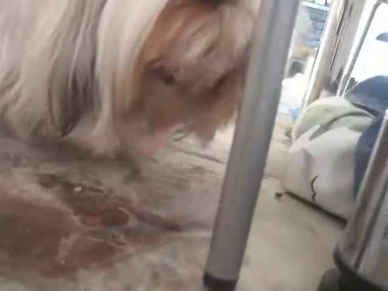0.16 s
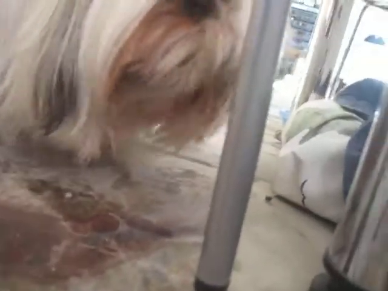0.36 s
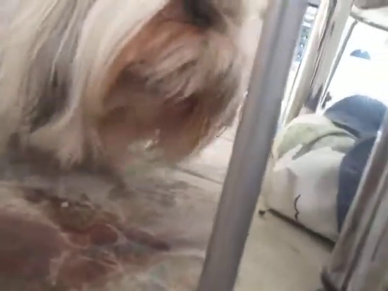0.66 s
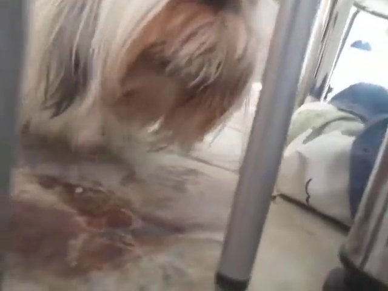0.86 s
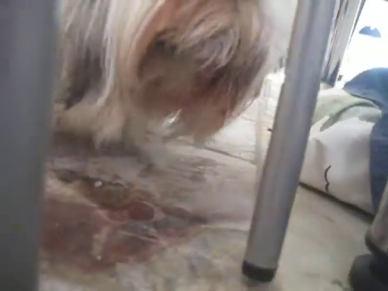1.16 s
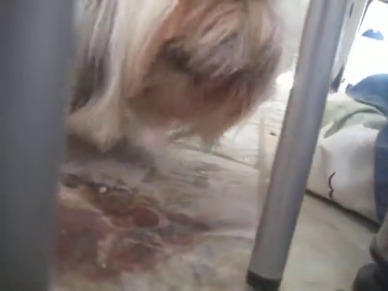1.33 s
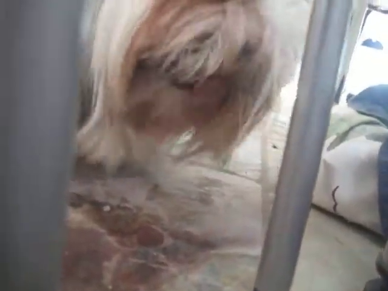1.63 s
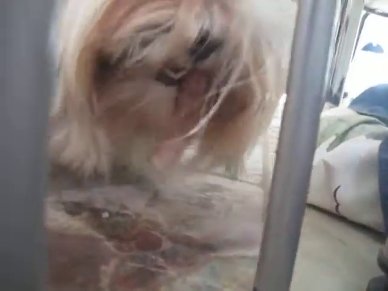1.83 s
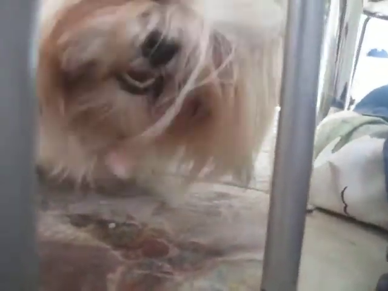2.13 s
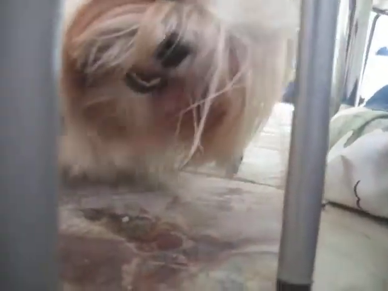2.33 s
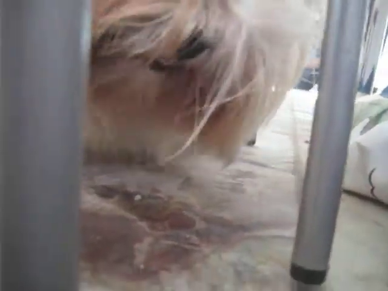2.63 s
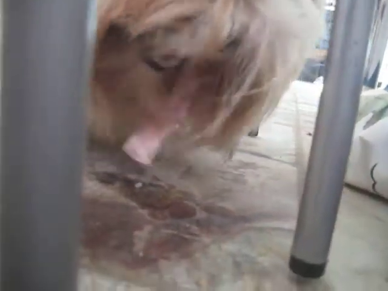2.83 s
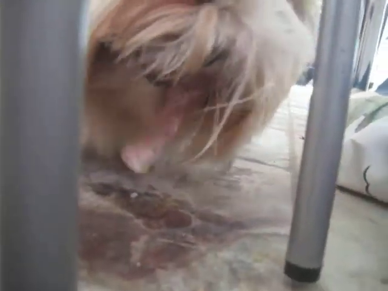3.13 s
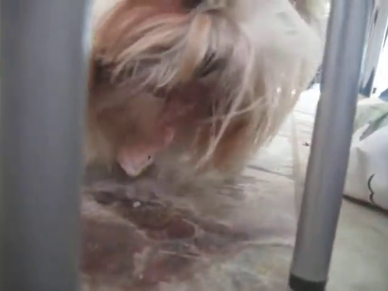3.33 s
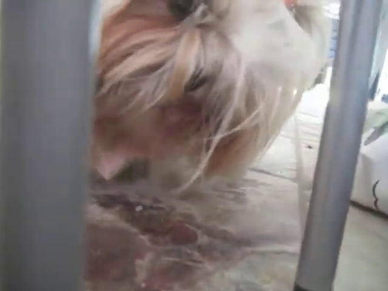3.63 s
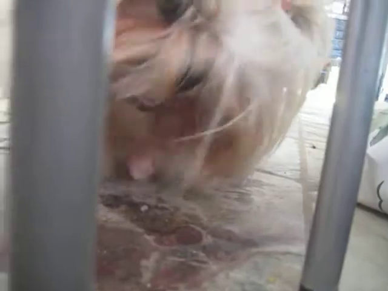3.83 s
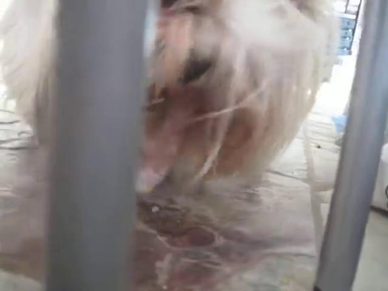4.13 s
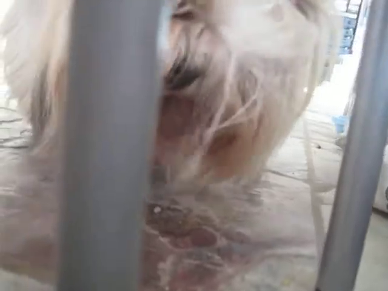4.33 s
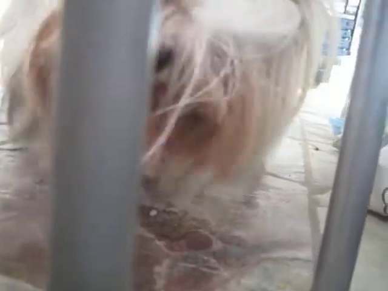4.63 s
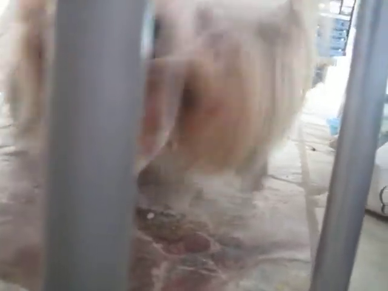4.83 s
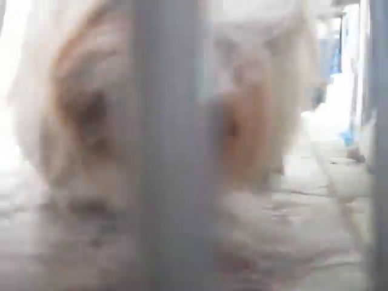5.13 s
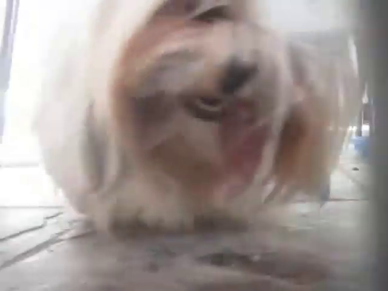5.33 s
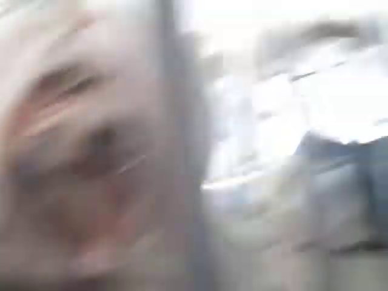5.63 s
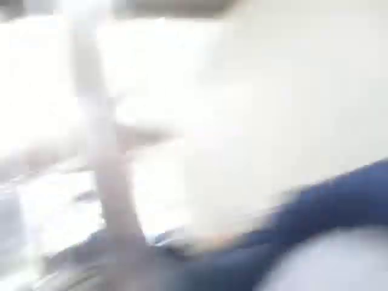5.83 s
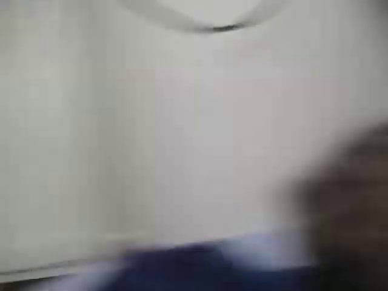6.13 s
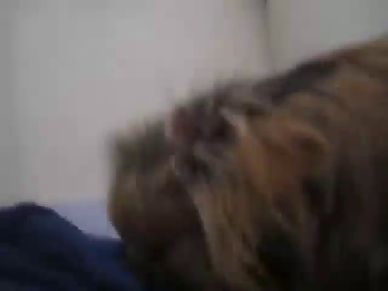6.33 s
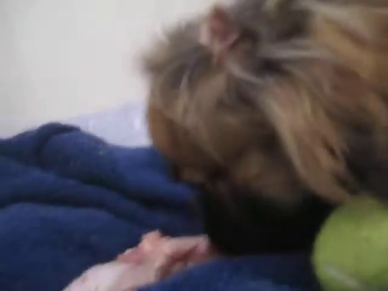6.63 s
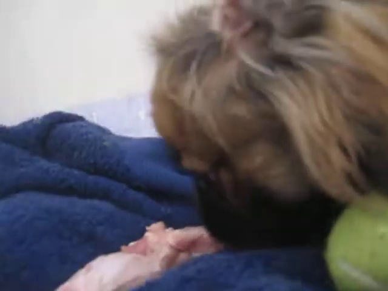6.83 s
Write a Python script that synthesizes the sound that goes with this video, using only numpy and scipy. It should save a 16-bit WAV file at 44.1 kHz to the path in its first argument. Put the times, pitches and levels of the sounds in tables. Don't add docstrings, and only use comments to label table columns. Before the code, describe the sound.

Bone crunches continuously in a small dog's mouth, several uneven bites a second. Sharp shards snap, bright splinters tick, gristle crackles, and wet lips click and smack. Chewing eases a little around three seconds, becomes dense after four, and peaks with a hard crack just past six amid rubbing rustle as the camera moves. The microphone is near and dry, in a small hard room, with steady faint electronic hum and hiss.

```python
import sys
import numpy as np
from scipy import signal
from scipy.fft import rfft, irfft, next_fast_len
from scipy.io import wavfile
from scipy.ndimage import uniform_filter1d, map_coordinates

SR = 44100
rng = np.random.default_rng(int(sys.argv[2]) if len(sys.argv) > 2 else 0)


def linear_from_db(decibels):
    return 10 ** (np.asarray(decibels, float) / 20)


def unload_wav(signal):
    wavfile.write(
        sys.argv[1],
        SR,
        np.round(np.clip(np.atleast_2d(signal).T, -1, 1) * 32767).astype(np.int16),
    )


N = 306936


def unit(x):
    return x / np.sqrt(np.mean(x ** 2) + 1e-20)


def wobble(rate):
    knots = rng.standard_normal(int(N * rate / SR) + 4)
    return map_coordinates(knots, [np.arange(N) * rate / SR])


def coloured(x, points):
    m = next_fast_len(N + 8192)
    hz, db = np.transpose(points)
    gain = linear_from_db(np.interp(np.log(np.fft.rfftfreq(m, 1 / SR) + 1), np.log(hz), db, -120, -120))
    return unit(irfft(rfft(x, m) * gain, m)[:N])


def add(track, s, sound):
    track[round(s * SR):][:len(sound)] += sound


def chance(hz, octaves):
    return hz * 2 ** (octaves * np.clip(rng.standard_normal(), -2, 2))


def fracture(hz, octaves, t60, t):
    fading = linear_from_db(-60 * t / t60) + linear_from_db(-10 - 60 * t / (4 * t60))
    force = fading * rng.standard_normal(len(t))
    force[0] = 11.1 * np.sign(force[0])
    edges = np.clip(hz * 2 ** (octaves * np.array([-.5, .5])), 100, .45 * SR)
    burst = signal.sosfilt(signal.butter(3, edges, "bandpass", fs=SR, output="sos"), force)
    return burst / np.abs(burst).max()


# (multiple of the hum pitch, level [dB rms])
HUM_OVERTONES = [(1, -59), (2, -68), (3, -85), (4, -73.5), (5, -71), (6, -70), (7, -69), (9, -77),
                 (30, -70)]
# (pitch [Hz], level [dB rms])
WHINE_TONE = (5879.6, -65.5)
# (pitch [Hz], level [dB per Hz])
HISS_COLOUR = [(20, -1.5), (350, 3), (1000, -1), (2500, -8), (4200, -9.5), (8500, -17.5), (12000, -17.5),
               (16000, -34)]


def camera():
    hum_hz = 49.17
    turn = 2 * np.pi * np.cumsum(hum_hz * (1 + 0.00173 * wobble(2.55))) / SR
    hum = np.zeros(N)
    for multiple, db in HUM_OVERTONES:
        level = linear_from_db(db + 0.63 * wobble(5.8))
        hum += level * np.sin(multiple * turn + rng.uniform(0, 2 * np.pi))
    whine_hz, whine_db = WHINE_TONE
    whine = linear_from_db(whine_db + wobble(6.7)) * np.sin(2 * np.pi * whine_hz * np.arange(N) / SR)
    hiss = linear_from_db(-57.0) * coloured(rng.standard_normal(N), HISS_COLOUR)
    return np.sqrt(2) * (hum + whine) + hiss


def kitchen(x):
    t = np.arange(SR // 3) / SR
    tail = rng.standard_normal(len(t)) * linear_from_db(-60 * t / 0.27) * (1 - np.exp(-t / 0.002))
    tail = signal.lfilter([1], [1, -.82], tail)
    return signal.fftconvolve(x, tail / np.linalg.norm(tail))[:N]


def patchy(x, depth_db):
    z = signal.stft(x, nperseg=128)[2]
    field = uniform_filter1d(rng.standard_normal(z.shape), size=6, axis=0)
    field = uniform_filter1d(field, size=14, axis=1)
    return signal.istft(z * linear_from_db(depth_db * unit(field)), nperseg=128)[1][:N]


# (start [s], end [s])
RUSTLE_SPAN = (5.67, 6.97)


def crackle(per_s, spread_db, noise_share, patch_db=3.5):
    fires = rng.random(N) < per_s / SR * linear_from_db(6 * wobble(30))
    sizes = linear_from_db(spread_db * np.clip(rng.exponential(size=N), 0, 2))
    grains = np.convolve(fires * sizes, np.exp(-np.arange(40) / 12))[:N] * rng.standard_normal(N)
    swinging = np.abs(np.arange(N) / SR - np.mean(RUSTLE_SPAN)) < np.ptp(RUSTLE_SPAN) / 2
    share = np.where(swinging, .75, np.clip(noise_share, 0, 1))
    rubbing = unit(linear_from_db(2.2 * wobble(60)) * rng.standard_normal(N))
    return patchy(np.sqrt(1 - share) * unit(grains) + np.sqrt(share) * rubbing, depth_db=patch_db)


# (time of full pressure [s], held [s],
# gristle level [dB], extra brittleness [dB])
JAW_STROKES = [(.012, 0.01, -51, -12), (.17, 0.012, -44.5, -5), (.344, 0.045, -48, -12),
               (.569, 0.01, -43.5, -12), (.708, 0.035, -47, -17), (.938, 0.0061, -43, -5.5),
               (1.1, 0.035, -50, -10.5), (1.337, 0.05, -49.5, -2), (1.65, 0.15, -51.5, -5),
               (1.955, 0.03, -50, -1), (2.399, 0.11, -47, -5.5), (2.679, .01, -59, -12),
               (2.804, 0.022, -50, -4), (2.978, 0.0042, -72, -3), (3.148, 0.0065, -55.5, -2),
               (3.41, 0.091, -68.5, 13), (3.635, 0.047, -49.5, -22), (3.74, 0.1, -50.5, -3),
               (4.096, 0.14, -50.5, -5), (4.415, 0.19, -50, -11), (4.759, 0.12, -47, -10.5),
               (5.07, 0.2, -49, -9.5), (5.46, 0.18, -57, 1), (5.721, 0.028, -38, -10.5),
               (5.971, 0.089, -48, 0), (6.162, 0.016, -43, -9), (6.24, 0.18, -43.5, -2.5),
               (6.58, 0.011, -49, -3), (6.767, 0.0048, -44.5, -6.5), (6.95, .02, -47.5, -8)]


def pressure():
    bite_db_per_s, ease_db_per_s = 183, 153
    rest_mouth_db, rest_gristle_db, rest_fizz_db = -60.5, -58, -63
    s, held, db, brittle_db = np.transpose(JAW_STROKES)[..., None]
    t = np.arange(0, N, 64) / SR
    building_db = bite_db_per_s * np.clip(s - t, 0, None)
    easing_db = ease_db_per_s * np.clip(t - s - held, 0, None)
    stroke = linear_from_db(db - building_db - easing_db)
    gristle = np.sqrt(linear_from_db(2 * rest_gristle_db) + np.sum(stroke ** 2, axis=0))
    fizz = np.sqrt(linear_from_db(2 * rest_fizz_db) + np.sum((stroke * linear_from_db(brittle_db)) ** 2, axis=0))
    mouth = linear_from_db(rest_mouth_db) * (gristle / linear_from_db(rest_gristle_db)) ** 0.38
    return [np.interp(np.arange(N) / SR, t, gain) for gain in (mouth, gristle, fizz)]


# (pitch [Hz], level [dB per Hz])
MOUTH_COLOUR = [(120, -10), (350, -1.5), (1200, 1), (2200, -12.5), (3500, -15)]
GRISTLE_COLOUR = [(1500, -4.5), (2600, -2), (3300, 2.5), (4250, 4.5), (5500, -1.5), (6600, -1.5),
                  (8500, -24)]
FIZZ_COLOUR = [(5000, -58), (7200, -6.5), (8500, -2), (11000, -8), (13000, -11.5), (15500, -15),
               (17000, -76)]


def grinding():
    common = crackle(per_s=180, spread_db=1.0, noise_share=0.26)
    mouth = 0.25 * common + crackle(per_s=60, spread_db=2.0, noise_share=0.85, patch_db=2.5)
    gristle = 1.11 * common + crackle(per_s=500, spread_db=4, noise_share=0.22)
    fizz = 1.3 * common + crackle(per_s=500, spread_db=11.0, noise_share=0.18)
    mouth = coloured(mouth, MOUTH_COLOUR)
    gristle = coloured(gristle, GRISTLE_COLOUR)
    fizz = coloured(fizz, FIZZ_COLOUR)
    t = np.arange(N) / SR
    dulled = signal.lfilter(*signal.butter(1, 7000, fs=SR), fizz)
    fizz = np.where(t < RUSTLE_SPAN[0], fizz, dulled)
    mouth = mouth * linear_from_db(6.5 * (t > 6.15) * (t < 6.6))
    mouth_gain, gristle_gain, fizz_gain = pressure()
    return mouth_gain * mouth + gristle_gain * gristle + fizz_gain * fizz


def small_clicks(events, octaves, t60):
    out, t = np.zeros(N + SR), np.arange(SR // 40) / SR
    for s, db, hz in events:
        add(out, s, linear_from_db(db - 1.5) * fracture(hz, octaves, t60, t))
    return out[:N]


# (time [s], peak level [dB], pitch [Hz])
MOUTH_CLICKS = [(0.2305, -37.7, 1410), (0.2369, -38.0, 1290), (0.4264, -41.5, 870), (0.5404, -39, 890),
                (1.387, -38, 1610), (1.5432, -41.6, 880), (1.5514, -41, 1260), (1.7717, -37.7, 1160),
                (2.1503, -36, 1200), (2.5102, -33, 1270), (2.8202, -41.5, 1230), (2.8594, -40, 1320),
                (2.8903, -34.5, 1280), (3.0721, -45, 523), (3.2854, -40, 1190), (3.8229, -36, 1800),
                (3.95, -39.5, 1020), (4.0604, -36.5, 1560), (4.3129, -32.5, 1130), (4.4625, -34, 1930),
                (4.4801, -38, 1680), (5.0988, -37, 1020), (5.8783, -39.1, 610), (5.9735, -31.7, 1320),
                (6.0328, -39, 1460), (6.6815, -40, 1310), (6.7682, -35.5, 1100), (6.8354, -37, 2000),
                (6.8944, -39, 1480)]


def clucks():
    return small_clicks(MOUTH_CLICKS, octaves=0.59, t60=0.0085)


# (time [s], peak level [dB], pitch [Hz])
TOOTH_NICKS = [(0.1243, -27, 3120), (0.1372, -29, 4010), (0.2306, -32, 3230), (0.7309, -30, 4150),
               (0.4364, -35, 4220), (0.6822, -37, 4180), (0.914, -29.8, 4010), (1.0637, -32, 4110),
               (1.0903, -29.0, 4170), (1.128, -25, 3770), (1.3423, -31.9, 3720), (1.4194, -28, 3510),
               (1.706, -28, 3660), (1.9874, -30.8, 3420), (2.0612, -34.5, 3300), (2.3973, -26, 4330),
               (2.4235, -28, 3710), (1.1404, -31, 4050), (2.7029, -32, 4080), (2.7956, -35, 2500),
               (2.8224, -29.3, 4790), (2.8151, -31, 5190), (3.1704, -34, 3850), (3.563, -33.4, 4010),
               (5.813, -33, 2600), (5.7845, -27, 5000), (3.9711, -27, 5300), (4.0115, -34, 4100),
               (4.0686, -32, 3210), (4.0938, -30, 4450), (4.111, -26, 3820), (4.4983, -31.9, 3510),
               (4.8816, -29.5, 3190), (4.6254, -36, 4320), (4.7416, -30, 3460), (4.7459, -32.5, 5150),
               (4.8253, -28, 3230), (4.9856, -33, 3560), (5.2435, -31, 4130), (5.2225, -31, 3210),
               (5.326, -38, 4770), (5.401, -28.7, 4800), (5.4063, -33, 4450), (5.4611, -33, 5030),
               (5.4889, -29, 4640), (5.5011, -31.6, 3930), (5.5323, -29.5, 5120), (5.5468, -26.5, 5180),
               (5.6416, -31.9, 5010), (5.9985, -32, 4170), (6.0332, -32, 3760), (6.0603, -32.4, 4000),
               (6.4132, -31, 4290), (6.7765, -29, 4300), (6.5709, -27, 4200)]


def nicks():
    return small_clicks(TOOTH_NICKS, octaves=0.45, t60=0.0046)


# (time [s], peak level [dB], pitch [Hz])
BONE_FLECKS = [(0.0115, -34, 7670), (0.0173, -23.5, 10060), (0.1826, -26, 10300), (0.7495, -34, 11200),
               (0.523, -29, 9810), (0.5628, -30, 9010), (0.7445, -29, 8700), (0.789, -32, 10550),
               (1.1404, -35, 9170), (1.0537, -34, 8110), (1.064, -32, 8510), (1.874, -36, 11300),
               (1.3352, -20, 11500), (1.3748, -33, 13400), (1.4237, -26, 8490), (1.4654, -32, 10390),
               (1.7012, -30, 12500), (1.6946, -33.3, 8310), (1.7059, -31, 7460), (1.7765, -37, 11500),
               (1.896, -33, 7610), (2.3883, -30, 11200), (2.0237, -20, 10500), (2.4328, -26, 8160),
               (4.4206, -26, 11000), (2.6288, -35.4, 9180), (0.1364, -31, 11300), (3.0925, -33, 8120),
               (3.3819, -36, 12500), (3.4291, -33, 7500), (3.7244, -29, 13500), (4.0114, -36, 9370),
               (4.1221, -27, 8590), (4.4703, -22.5, 7000), (4.4992, -33, 8900), (4.5029, -22, 7440),
               (4.5094, -28, 7430), (4.7339, -25, 6900), (4.7447, -29, 7010), (4.761, -32.4, 7520),
               (4.2306, -35, 12400), (4.9562, -35, 7880), (4.9696, -35, 7840), (5.0197, -34, 8080),
               (5.2436, -27, 8500), (5.2642, -29.8, 8840), (5.9573, -35, 9260), (5.3259, -36, 9370),
               (5.3901, -34, 11200), (5.4062, -33, 9290), (5.805, -32, 8500), (5.5066, -24.5, 8970),
               (5.5324, -34.7, 9490), (5.7306, -23, 9150), (5.7632, -29, 8650)]


def flecks():
    return small_clicks(BONE_FLECKS, octaves=0.42, t60=0.0044)


# (time [s], peak level [dB], pitch [Hz])
LIP_SMACKS = [(0.179, -27.5, 1580), (0.262, -30, 1010), (0.482, -34.5, 1570), (1.304, -39, 1630),
              (1.909, -33.5, 1160), (2.173, -31, 1050), (2.208, -30.5, 1210), (2.718, -40, 1210),
              (2.795, -34, 2090), (2.904, -35.5, 720), (3.436, -35, 1140), (3.969, -32, 900),
              (4.742, -32, 1860), (6.621, -32.5, 1630)]


def smacks():
    out, t = np.zeros(N + SR), np.arange(SR // 20) / SR
    for s, db, hz in LIP_SMACKS:
        swell = linear_from_db(db - 3.0 - 60 * t / 0.02) * (1 - np.exp(-t / 0.000083))
        add(out, s, swell * np.sin(2 * np.pi * hz * t * (1 + 6 * t)))
    return out[:N]


# (time [s], level [dB], pitch [Hz], width [Hz], time to
# fade 60 dB [s])
CRUSHES_AND_POPS = [(.322, -22.5, 920, 503, 0.0097), (0.688, -19.5, 1040, 350, 0.027),
                    (1.944, -32, 1340, 220, 0.096), (1.06, -47, 4120, 1500, 0.44),
                    (1.815, -39, 1700, 400, 0.1), (6.33, -50, 1000, 1200, 0.52),
                    (2.11, -26, 597, 800, 0.018), (2.344, -20, 1160, 500, 0.0096),
                    (2.538, -37.5, 1340, 200, 0.061), (3.228, -49, 1580, 248, 0.15),
                    (3.474, -39.5, 334, 800, 0.15), (3.623, -31.5, 1320, 1190, 0.19),
                    (3.753, -43, 260, 300, 0.07), (6.556, -36.5, 6330, 1300, 0.08),
                    (3.625, -39.5, 9200, 3000, 0.2), (4.398, -28.5, 9400, 1500, 0.034),
                    (4.771, -46, 2490, 1290, 0.62), (5.686, -43.5, 890, 1500, 0.35),
                    (5.931, -44.5, 1550, 500, 0.34), (6.063, -28, 850, 1000, 0.033),
                    (6.135, -34, 590, 800, 0.021), (6.15, -23, 3330, 1400, 0.12),
                    (6.155, -34, 6000, 1800, 0.3), (3.625, -39.5, 4340, 4000, 0.18),
                    (6.247, -39, 5400, 2500, 0.38), (6.556, -34, 4370, 900, 0.15),
                    (6.696, -39, 2490, 1520, 0.095), ]


def crushes():
    out, t = np.zeros(N + SR), np.arange(SR // 4) / SR
    for s, db, hz, width_hz, t60 in CRUSHES_AND_POPS:
        b, a = signal.iirpeak(hz, hz / width_hz, SR)
        lumps = linear_from_db(4.4 * unit(uniform_filter1d(rng.standard_normal(len(t)), size=60)))
        tail = signal.lfilter(b, a, lumps * rng.standard_normal(len(t)))
        tail = signal.lfilter(b, a, tail)
        add(out, s, linear_from_db(db - 60 * t / t60) * (1 - np.exp(-t / 0.00093)) * unit(tail))
    return out[:N]


# (time [s], peak level [dB], pitch [Hz], time to fade 60 dB [s])
BREAK_RINGS = [(0.3219, -17.5, 2310, 0.011), (0.3207, -38, 540, 0.023), (.6888, -12.5, 4250, 0.022),
               (.6895, -24.5, 2160, 0.017), (2.1101, -30.5, 395, 0.0089), (4.3723, -28, 1950, 0.045),
               (4.3728, -38, 423, .02), (4.7702, -26, 1970, 0.025), (4.7698, -36, 2600, 0.016),
               (6.0645, -38, 326, 0.085), (6.0645, -24.5, 757, 0.032), (6.0635, -22, 1120, 0.021),
               (6.0633, -33, 1450, 0.026), (6.1382, -5, 6000, 0.007), (6.1376, -24, 14600, 0.0016),
               (3.6237, -19, 1750, 0.013)]


def rings():
    out, t = np.zeros(N + SR), np.arange(SR // 10) / SR
    for s, db, hz, t60 in BREAK_RINGS:
        swell = linear_from_db(db - 60 * t / t60) * (1 - np.exp(-3 * hz * t))
        add(out, s, swell * np.sin(2 * np.pi * hz * t))
    return out[:N]


JAW_DB = -18.5


def small_break(s, shard_db, splinter_db, shard_hz):
    splinter_hz = chance(8580 if s < RUSTLE_SPAN[0] else 7170, 0.18)
    return s, shard_db + JAW_DB, shard_db, splinter_db, shard_hz, splinter_hz


# (time [s], peak level [dB])
FAINT_TICKS = [(0.0907, -24), (0.5975, -25), (0.863, -25), (1.127, -29), (1.643, -24.5), (1.6818, -27),
               (2.774, -25), (2.8225, -36), (2.8603, -26), (2.9864, -30.5), (3.342, -25.5), (3.419, -30),
               (3.553, -24.5), (3.9645, -28), (4.0226, -31), (4.4204, -27), (4.442, -21), (4.503, -26),
               (4.5143, -30), (4.7572, -24), (4.711, -33), (5.1257, -21.5), (5.391, -28), (6.032, -29),
               (6.4815, -26)]


def faint_ticks():
    return [small_break(s, db - 3.0, db - .8, chance(4040, 0.19)) for s, db in FAINT_TICKS]


# (time [s], peak level [dB], pitch [Hz])
DULL_TICKS = [(0.175, -25, 3150), (0.262, -23, 4450), (0.352, -25, 3600), (0.4259, -23, 3300),
              (0.828, -23.5, 3600), (1.035, -20, 3770), (1.1642, -25.5, 3800), (1.2316, -24, 3750),
              (1.3737, -25.5, 3580), (1.3992, -22.5, 3800), (1.5632, -27, 3280), (2.2956, -24, 3750),
              (2.6785, -24, 3940), (3.1153, -28, 4600), (3.6887, -23, 3450), (3.723, -25, 3690),
              (3.7628, -25, 3900), (3.8564, -22, 4500), (4.0757, -21, 3930), (4.4268, -20, 4330),
              (4.4805, -18, 4300), (5.025, -23.5, 3760), (5.1669, -24.5, 4220), (5.236, -20.5, 4340),
              (5.4103, -21, 4580), (6.1415, -8, 3400), (6.558, -27, 4200), (6.8947, -23, 3550)]
CHIPPING_TICKS = [(0.017, -28.5, 3500), (0.1804, -21, 3080), (0.237, -23, 3100), (0.2704, -26, 3150),
                  (0.7492, -28, 3900), (0.8322, -26.5, 5000), (0.922, -20.5, 3900), (1.028, -24.5, 3880),
                  (1.4468, -19, 3200), (1.6472, -27, 3400), (1.7722, -26.5, 3070), (1.791, -24, 3870),
                  (2.096, -24, 3960), (2.2146, -26, 3900), (2.3562, -21, 4070), (2.3959, -29, 4630),
                  (2.8448, -24.5, 4180), (3.286, -26, 3830), (3.4353, -19, 4140), (4.0799, -24, 3800),
                  (4.118, -22, 4150), (4.2307, -25, 4740), (4.4556, -24, 4230), (4.4699, -30, 3890),
                  (4.5247, -20.5, 3300), (4.8291, -21, 3260), (5.367, -21, 4070), (5.4816, -29, 4420),
                  (5.731, -29, 4100)]


def ticks():
    rows = []
    for events, fizz_db in [(DULL_TICKS, -17), (CHIPPING_TICKS, -4)]:
        for s, db, hz in events:
            rows.append(small_break(s, db, db + 4.5 + fizz_db, hz))
    return rows


# (time [s], peak level [dB], pitch [Hz])
THIN_SPLINTERS = [(0.14, -23, 8100), (0.1948, -18, 8900), (0.517, -16, 10100), (0.8, -9, 11100),
                  (0.9365, -17, 10000), (1.183, -21.5, 8040), (1.321, -12, 12000), (1.4186, -11.5, 8400),
                  (1.612, -21, 6530), (1.6524, -28, 7700), (1.728, -21, 9400), (1.805, -15.5, 11300),
                  (2.0238, -14, 6600), (2.2093, -20.5, 9000), (2.054, -29, 10500), (2.3818, -24, 7400),
                  (2.508, -21.5, 8200), (2.7614, -16, 9200), (3.0687, -21, 8760), (3.3929, -12.5, 9000),
                  (3.717, -19.5, 9840), (3.7835, -21.5, 8600), (4.0933, -20, 7980), (4.1108, -10, 8600),
                  (4.5376, -19, 8400), (4.5925, -15, 9300), (4.854, -19.5, 7130), (5.228, -24, 9300),
                  (5.4004, -29, 7640), (5.5, -29, 8700)]


def splinters():
    rows = []
    for s, db, hz in THIN_SPLINTERS:
        body_db = db - 15.5
        rows.append((s, body_db + JAW_DB, body_db, db - 2, chance(3940, .13), hz))
    return rows


# (time [s], shard peak level [dB], splinter peak level [dB], shard pitch [Hz])
SNAPPED_SHARDS = [(1.4438, -13, -41, 3430), (1.627, -15.5, -25, 3670), (1.7976, -19, -16.5, 4330),
                  (2.511, -32, -29, 3270), (2.6671, -18, -10, 4650), (2.8905, -18.5, -29, 4000),
                  (3.4894, -23.5, -19, 4130), (3.6351, -23, -30, 3530), (3.8233, -12, -18, 3800),
                  (4.0611, -15.5, -21, 4800), (4.3134, -16.5, -27, 4500), (4.396, -12.5, -28, 3830),
                  (4.4627, -13.5, -23, 3860), (4.5299, -14, -26, 3900), (4.542, -20, -16, 4130),
                  (4.7334, -18.5, -30, 4000), (5.0985, -20.5, -37, 5140), (5.2786, -17.5, -24, 4100),
                  (5.2934, -11.5, -23.5, 4570), (5.3726, -20.5, -19.5, 4370), (5.6254, -18, -41, 4150),
                  (5.6336, -14.5, -36, 4000), (5.6485, -18, -43, 3900), (5.9733, -30, -29, 3620),
                  (6.1515, -17, -26, 3380), (.3241, -30, -13, 4300)]


def shards():
    return [small_break(*row) for row in SNAPPED_SHARDS]


# (time [s], jaw level [dB], shard level [dB], splinter level [dB], shard pitch [Hz]), all peak levels
BIG_CRACKS = [(.3214, -20, -4, -8.5, 4050), (.5542, -25.5, -22, -28, 2850), (.6879, -37, -14, -15, 4070),
              (.69, -22, -3, -10.5, 4110), (1.3356, -31, -19, -28, 3240), (1.698, -25.5, -13.5, -36, 2980),
              (1.7007, -38, -16.5, -25, 3040), (2.0276, -27.5, -14.5, -16, 3160),
              (2.11, -19.5, -17.5, -20, 5760), (2.3447, -21.5, -16, -39, 3450),
              (2.4294, -29, -21, -37, 3420), (2.4367, -24, -15.5, -30, 3200), (3.6241, -22, -37, -29, 3380),
              (3.7008, -24.5, -36, -47, 2900), (4.1634, -22.5, -13.5, -18.5, 4000),
              (4.1711, -25, -17, -20, 4340), (4.3727, -15, -18, -31, 3560), (4.7699, -23, -6, -30, 3070),
              (4.7981, -23, -31, -35, 3100), (5.7756, -23, -3.5, -3.5, 4400),
              (6.0644, -17, -16, -20.5, 4180), (6.1375, -14, 3, -18, 4500), (6.3173, -21, -27, -45, 4400)]


def cracks():
    rows = []
    for s, jaw_db, shard_db, splinter_db, shard_hz in BIG_CRACKS:
        splinter_hz = small_break(s, shard_db, splinter_db, shard_hz)[-1]
        rows.append((s, jaw_db, shard_db, splinter_db, shard_hz, splinter_hz))
    return rows


# (width [octaves], time to fade 60 dB [s])
SNAP_PARTS = [
    (1.63, 0.0097),
    (0.66, 0.0039),
    (0.55, 0.0034),
]


def snaps():
    out, tips, t = np.zeros(N + SR), np.zeros(N + SR), np.arange(SR // 25) / SR
    for s, *levels_db, shard_hz, splinter_hz in cracks() + shards() + ticks() + faint_ticks() + splinters():
        life = linear_from_db(0.21 * (max(levels_db) + 40.5))
        pitches_hz = chance(1800, .14), shard_hz, splinter_hz
        for db, hz, (octaves, t60) in zip(levels_db, pitches_hz, SNAP_PARTS):
            add(out, s, linear_from_db(db - 3.5) * fracture(hz, octaves, life * t60, t))
        tip_db = levels_db[-1] - 20 - 8 * (s > RUSTLE_SPAN[0]) + rng.normal(0, 3.8)
        add(tips, s, linear_from_db(tip_db - 60 * t / 0.005) * rng.standard_normal(len(t)))
    top_band = signal.butter(3, [11500, 15800], "bandpass", fs=SR, output="sos")
    return out[:N] + signal.sosfilt(top_band, tips[:N])


def scene():
    dog = snaps() + crushes() + smacks() + rings()
    room = linear_from_db(-26) * kitchen(dog)
    close_clicks = nicks() + flecks() + clucks()
    return (dog + room + grinding() + camera() + close_clicks)[None]


def band_limit(x):
    return signal.sosfilt(signal.butter(12, 17010, fs=SR, output="sos"), x)


def record(dry):
    m = next_fast_len(N)
    hz = np.fft.rfftfreq(m, 1 / SR)
    squashed = dry / (1 + np.abs(dry / .72) ** 4) ** (1 / 4)
    fading = linear_from_db(-9 * np.clip(hz / 1000 - 15.4, 0, None))
    mix = irfft(rfft(squashed, m) * fading * (hz < 17000), m)[:, :N]
    return band_limit(mix)


dry = scene()
out = record(dry)
unload_wav(out)
```